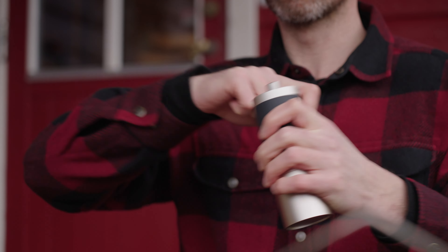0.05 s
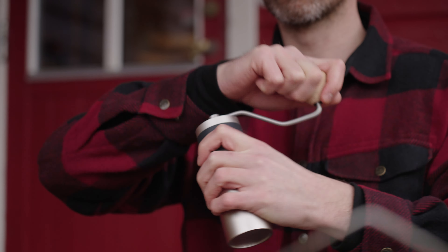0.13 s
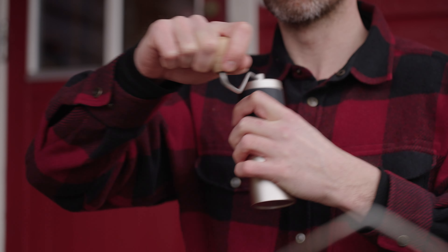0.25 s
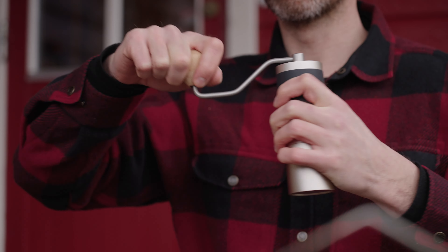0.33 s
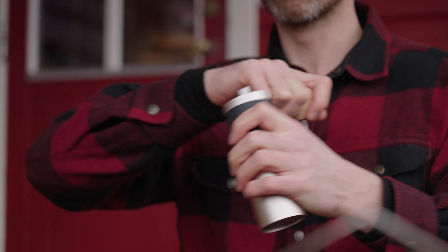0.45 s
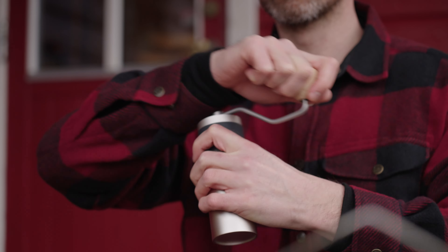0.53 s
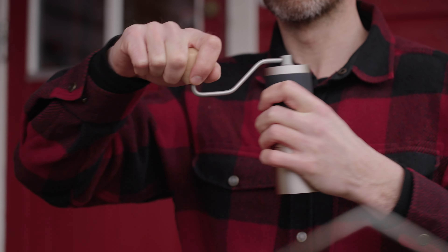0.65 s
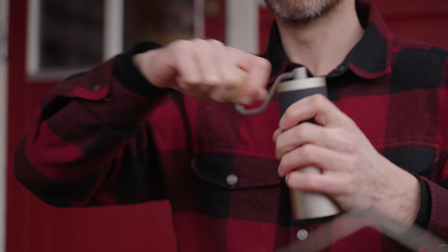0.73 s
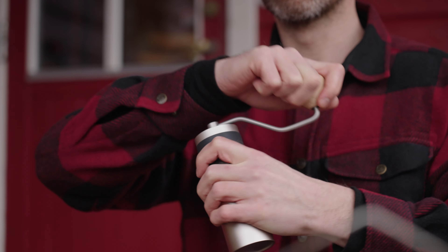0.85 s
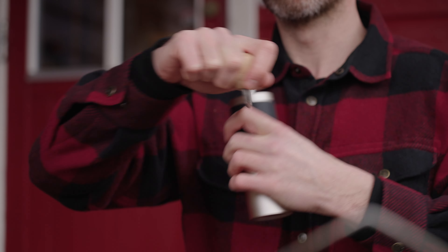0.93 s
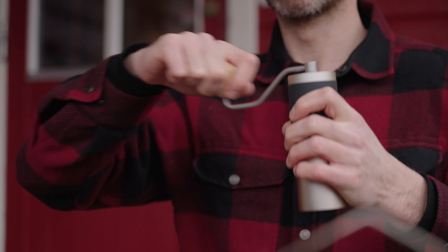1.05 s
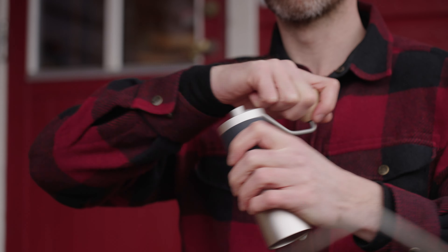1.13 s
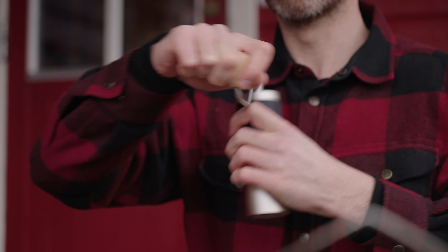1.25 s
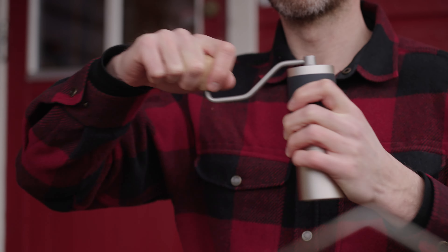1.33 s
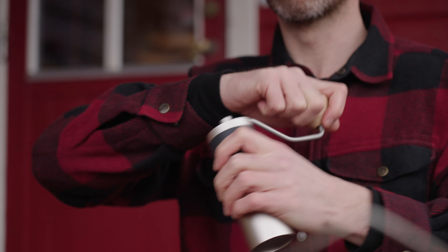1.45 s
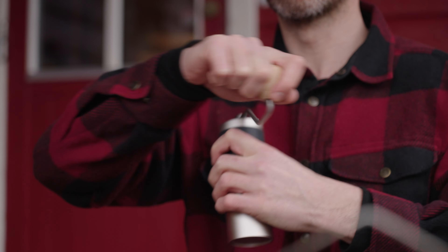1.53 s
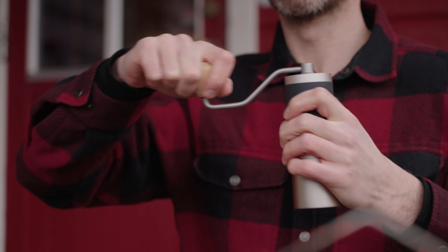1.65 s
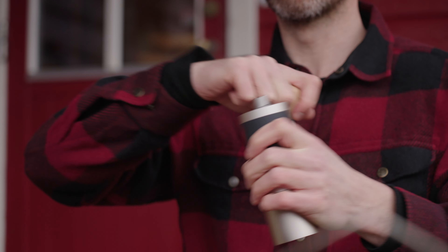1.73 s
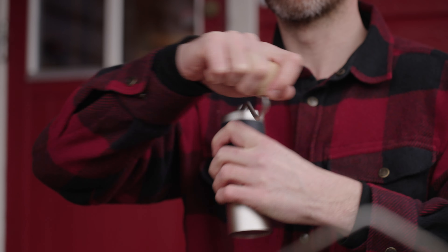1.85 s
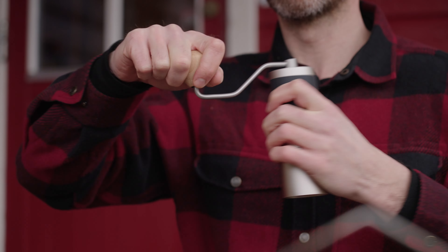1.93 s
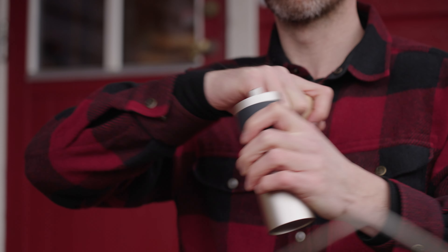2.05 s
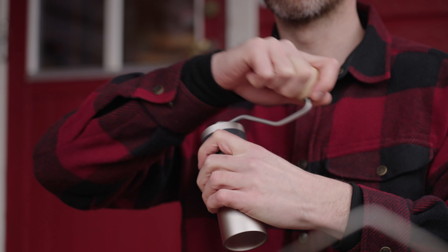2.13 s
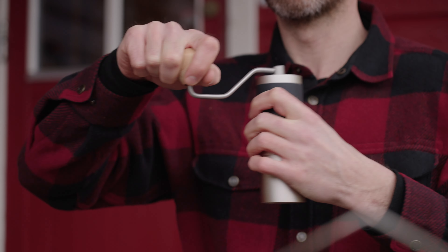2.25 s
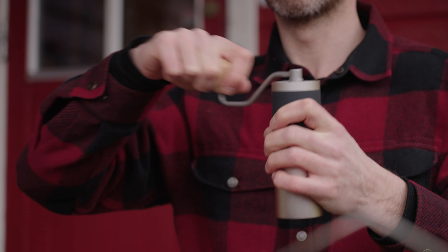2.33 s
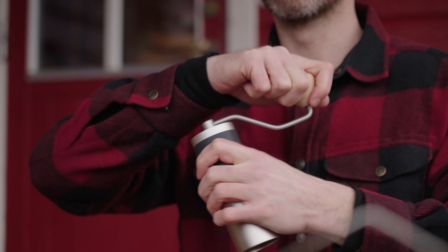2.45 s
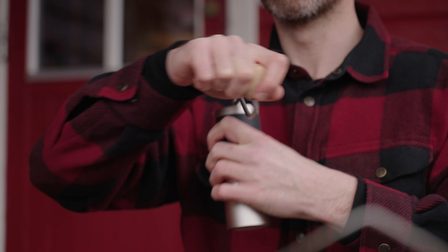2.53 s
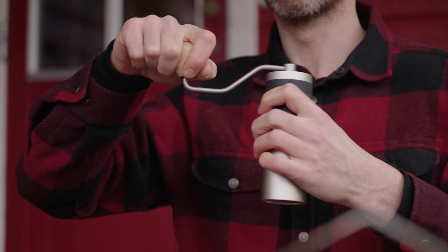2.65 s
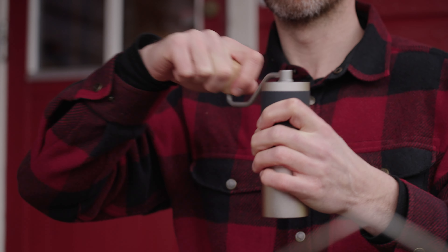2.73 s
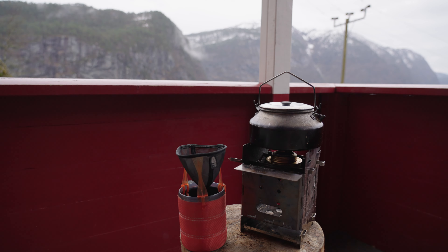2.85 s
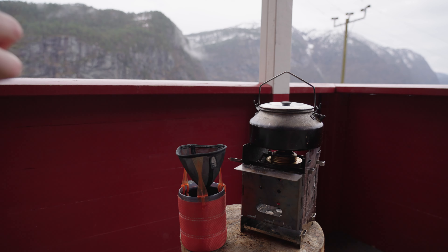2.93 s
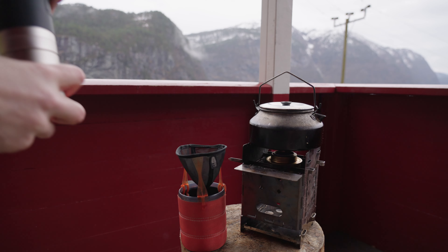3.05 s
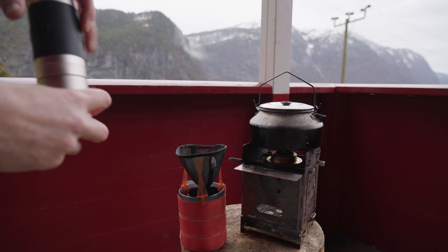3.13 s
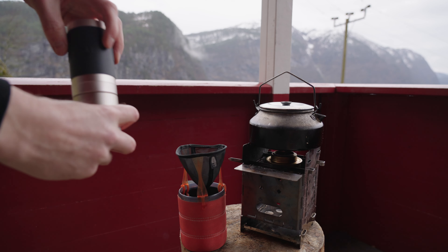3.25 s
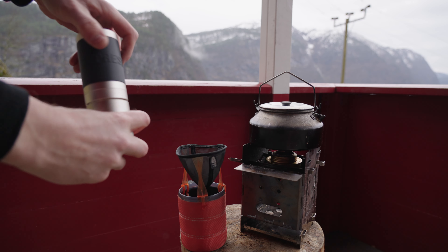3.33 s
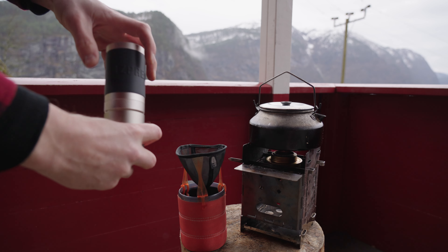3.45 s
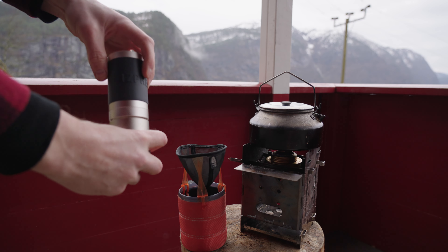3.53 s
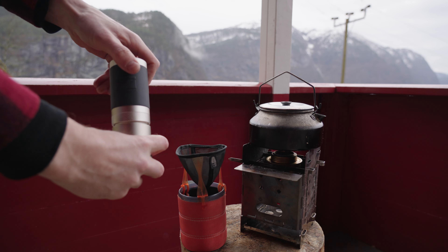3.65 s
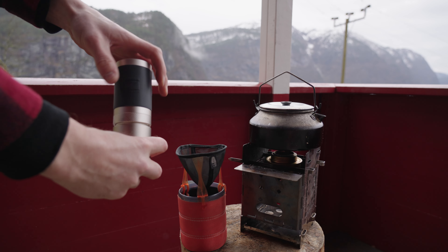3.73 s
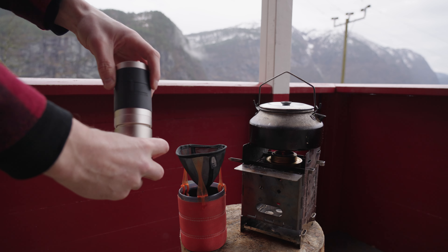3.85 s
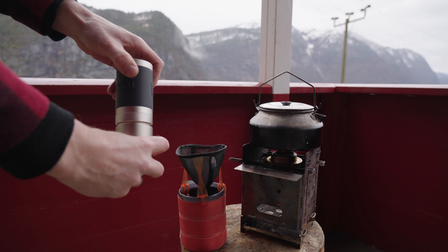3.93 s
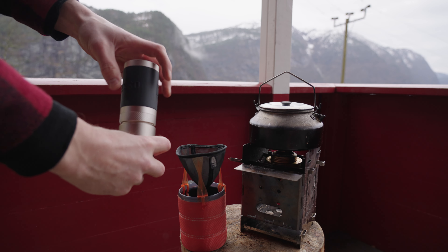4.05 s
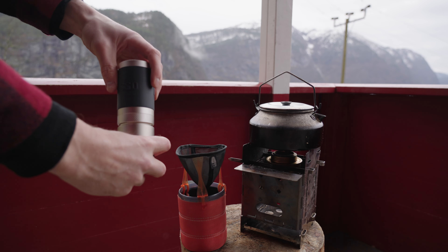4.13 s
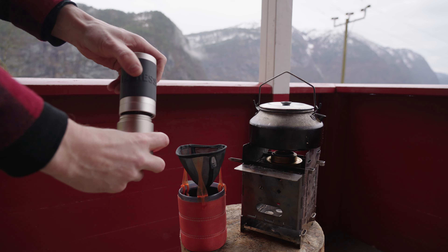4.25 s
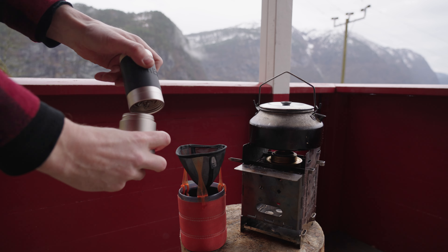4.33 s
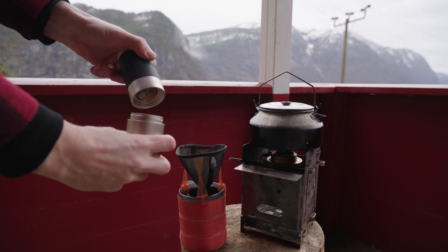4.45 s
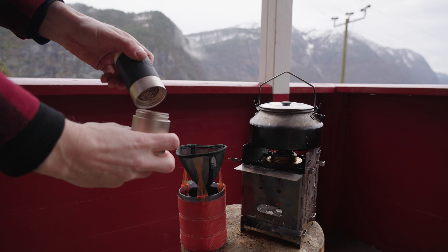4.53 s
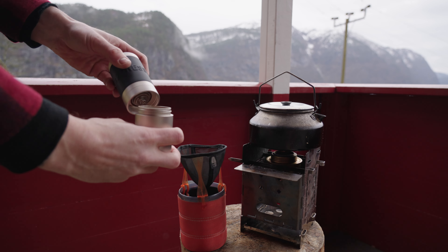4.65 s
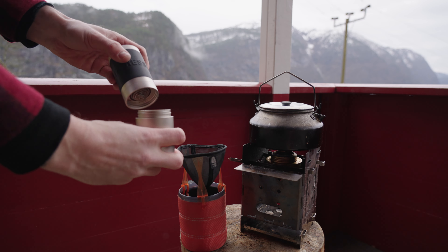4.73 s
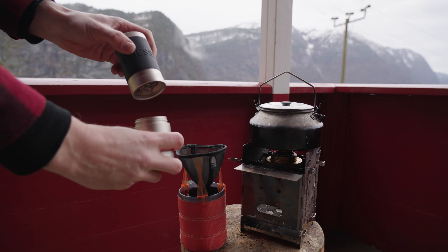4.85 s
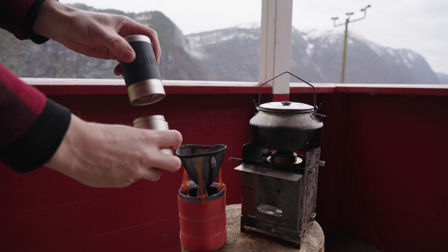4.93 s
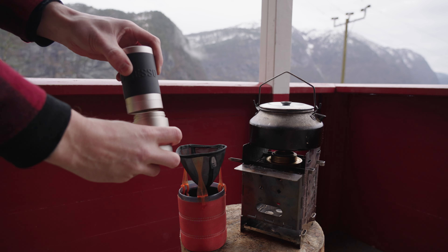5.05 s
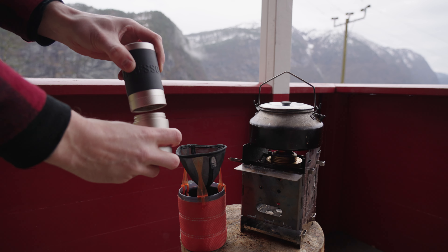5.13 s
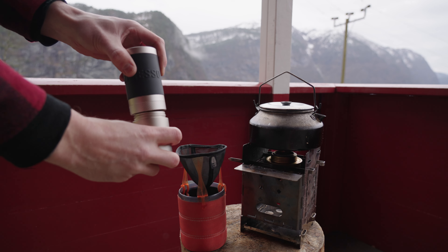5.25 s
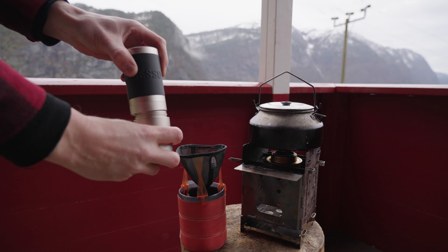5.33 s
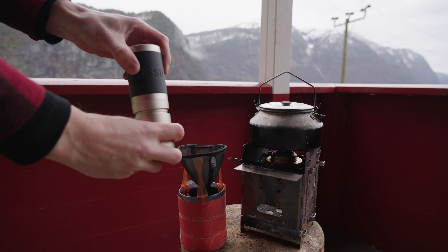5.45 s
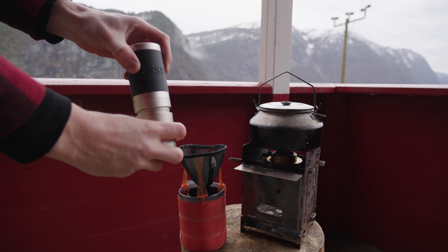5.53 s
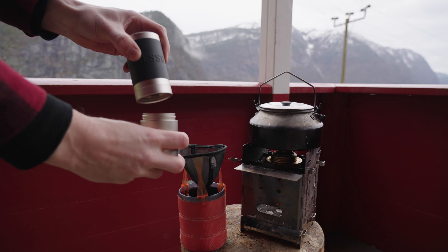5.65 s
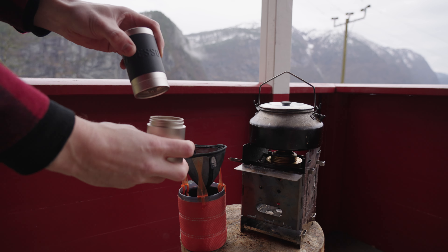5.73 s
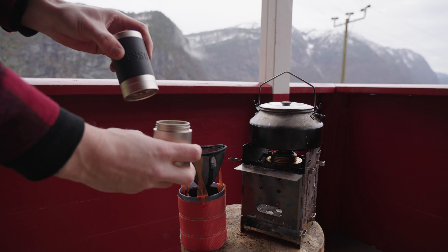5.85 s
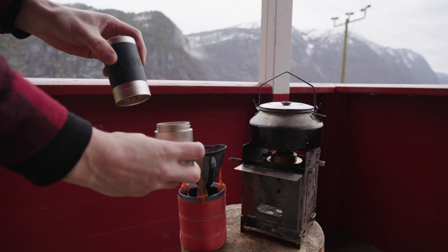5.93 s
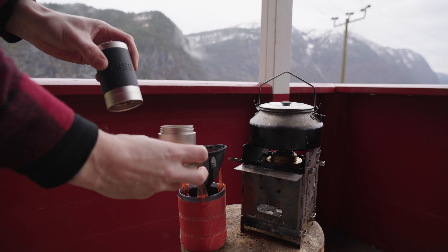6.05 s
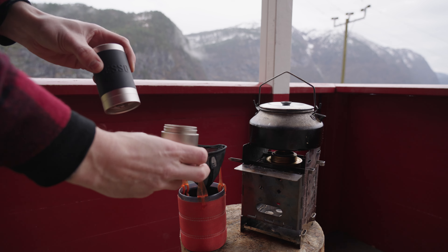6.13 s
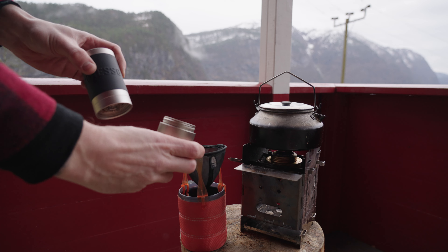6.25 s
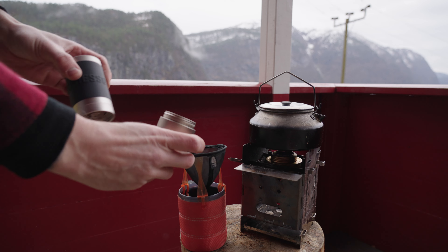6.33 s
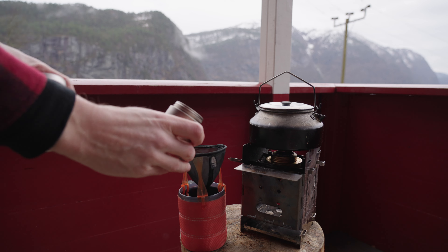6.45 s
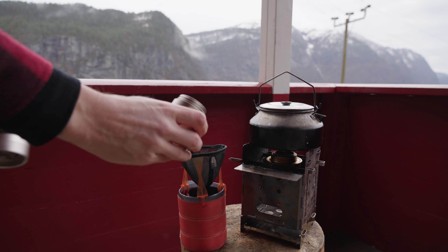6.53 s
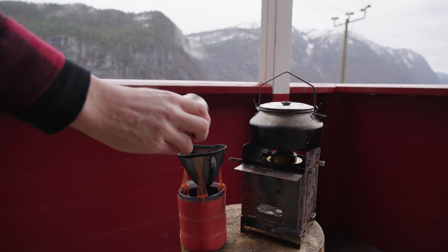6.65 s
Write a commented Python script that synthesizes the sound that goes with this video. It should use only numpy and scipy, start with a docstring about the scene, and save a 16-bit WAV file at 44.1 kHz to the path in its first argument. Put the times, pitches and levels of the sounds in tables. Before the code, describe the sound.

Close, dry crackling of beans in a manual coffee grinder, followed by short metallic thread scrapes and a cluster of bright metal taps.

```python
"""Coffee beans crush between the burrs of a hand-cranked grinder on an open wooden porch: random fractures drive
the resonances of barrel and crank, with a few short pings. From 2.9 s the metal cup is unscrewed in five twists,
as stick-slip noise on a wavering ring, with low squeaks and modal knocks. Then the cup is tapped on the barrel,
as decaying modes, and thin gliding whistles pass. Shaped noise lies below all as far outdoor air, with a faint
hum during the grinding; feedback delays give the porch."""
import sys
import numpy as np
from scipy import signal
from scipy.fft import rfft, irfft, next_fast_len
from scipy.io import wavfile

SR = 44100
rng = np.random.default_rng(int(sys.argv[2]) if len(sys.argv) > 2 else 0)


def voltage_ratio(decibels):
    """Convert decibels (scalar or array-like) to amplitude ratios, 20 dB per decade."""
    exponent = np.asarray(decibels, float) / 20
    return 10 ** exponent


def transcribe(signal):
    """Save signal, clipped to [-1, 1], as a 16-bit WAV file at the path in sys.argv[1]."""
    frames = np.atleast_2d(signal).T
    limited = np.clip(frames, -1, 1)
    pcm = np.round(limited * 32767).astype(np.int16)
    wavfile.write(sys.argv[1], SR, pcm)


N = 295462

# Far air spectrum. Each row: frequency in Hz, relative density in dB.
AIR_SPECTRUM = [(12, -42), (20, -15.5), (58, -36.5), (74, -13), (130, -1.5), (228, -5), (328, -11),
                (357, -1.5), (499, -12), (542, -6), (780, -7.5), (1860, -15.5), (3340, -26), (5380, -33),
                (11000, -36), (16000, -37.5)]
# Far air over time. Each row: time in seconds, rms at 100-500 Hz in dB, treble trim in dB, rumble rms in dB.
AIR_LEVEL = [(0, -55, 3.5, -86), (2.74, -56, 2, -85), (2.89, -55, 1, -73), (3.21, -57, 5, -75),
             (3.53, -57, 4, -84), (4.72, -58.5, 1.5, -84), (5.88, -58.5, 2, -82), (6.7, -58, 4.5, -87)]
# Hum over time. Each row: time in seconds, rms in dB.
HUM_LEVEL = [(0, -63.5), (1.2, -66), (2.5, -58), (2.87, -69), (2.89, -100)]
HUM_HZ = 265.8

# Load on the burrs. Each row: time in seconds, crunch drive in dB.
BURR_LOAD = [(0, -54), (.18, -54.5), (.21, -44.5), (.42, -51.5), (.69, -48), (.84, -60), (.95, -45.5),
             (1.08, -53.5), (1.2, -59), (1.5, -59), (1.58, -49.5), (1.73, -58), (1.88, -56), (1.97, -67.5),
             (2.3, -59), (2.56, -65.5), (2.59, -49), (2.88, -52)]
# Whole beans cracking. Each row: start in seconds, drive in dB, low-part trim in dB, high-part trim in dB.
BEAN_CRACKS = [(0.0183, -41, -12, -12), (0.055, -28, -20, -16.5), (0.2034, -30, -8, -16),
               (0.2127, -29, -17, -22), (0.2713, -37, -8, -28), (0.2822, -33, -9, -27),
               (0.3116, -34, -3, -25), (0.4365, -27.5, -10, -15), (0.4646, -32.5, -5.5, -9.5),
               (0.5306, -32.5, -5, -20), (0.555, -31, -6, -18), (0.6143, -29.5, -9, -16),
               (0.6424, -26.5, -6, -15.5), (0.6656, -33, -14, -19), (0.6817, -32, -6, -12),
               (0.7039, -34, -4, -23), (0.8694, -31, -21, -18), (0.9179, -23.5, -26, -13),
               (0.9438, -23.5, -16, -10), (1.0053, -32.5, -15, -10), (1.0426, -35.5, 1.5, -20),
               (1.1007, -36, -8, -8), (1.229, -28, -16, -15), (1.245, -34.5, -16, -7),
               (1.2938, -37.5, -10, -14), (1.3274, -36, -3, -12), (1.3362, -26.5, -19, -14),
               (1.3624, -47, -14, -18), (1.5234, -37, -9, -13), (1.5628, -37, -14, -16),
               (1.591, -41, -12, -13), (1.697, -40, -6, -19), (1.7479, -36, 2, -14),
               (1.7656, -32, -10, -22), (1.8463, -33, -15, -21), (2.0116, -38.5, -5, -21),
               (2.2707, -31, -15, -21), (2.3232, -37, -4, -26), (2.545, -39, -4, -8),
               (2.5749, -20.5, -29, -21), (2.5934, -40, -12, -20), (2.6767, -34, -3, -21),
               (2.7436, -29, -11, -23), (2.819, -35.5, 2, -11), (2.8688, -28, -13, -27)]
# Resonances of the barrel full of beans. Each row: frequency in Hz, width of the first filter in Hz, gain in dB.
BARREL_MODES = [(740, 450, -4), (1090, 196, 1), (1404, 407, -3), (2280, 690, 0), (3280, 630, -6.5),
                (3990, 690, 1), (5830, 2900, -13.5), (6690, 630, 1.5), (7530, 1150, -10), (8700, 1400, -9),
                (9480, 810, -8.5), (11600, 4800, -22), (13800, 1000, -29)]
# Resonances of the crank on its shaft. Each row: frequency in Hz, width of the first filter in Hz, gain in dB.
CRANK_MODES = [(2620, 110, -34), (5430, 380, -13.5), (8670, 530, -4.5)]
# Loose shaft rattling, under the crank and later in the hand. Each row: start in seconds, push in dB,
# time constant in ms.
SHAFT_RATTLES = [(.765, -60, 8), (.782, -41.5, 8.7), (1.115, -40, 5.6), (1.174, -47.5, 11),
                 (1.219, -43.5, 6), (1.411, -38.5, 19), (1.435, -49, 13), (1.477, -44.5, 9),
                 (1.74, -49, 13), (1.871, -45.5, 14), (2.042, -43.5, 18), (2.18, -50, 8.3),
                 (2.392, -48, 12), (3.14, -63, 15), (3.225, -65, 10), (3.27, -60, 10), (3.75, -60, 10),
                 (3.79, -64, 8), (3.835, -63, 10), (4.055, -59, 24)]
RATTLE_IN_BARREL_DB, RATTLE_IN_SHAFT_DB = 12, 17
LOW_PUSH_DB, MIDDLE_PUSH_DB, HIGH_PUSH_DB = 12, 6.5, 5   # crunch on each group of resonances
CRUMBLE_DB, CRUMBLE_MS = -26.5, 15   # splinters after each crack: level against its drive, time constant
CHIPS_PER_S, CHIP_DB, CHIP_SPREAD_DB = 30, 10, 3.5   # small chips snapping: rate, drive over the crunch

PORCH_T60_S, PORCH_DB, WALL_CUT_HZ = 0.18, -19, 4100

# Short pings of the barrel. Each row: start in seconds, initial level in dB, frequency in Hz.
BARREL_PINGS = [(.056, -38.5, 2500), (.443, -40, 2280), (2.012, -41.5, 2400)]
PING_T60_S = 0.037

# Twists of the cup, one list per twist. Each row: time in seconds, rub drive in dB, pitch of the loose cup in Hz.
CUP_TWISTS = [
    [(2.89, -66, 5150), (2.932, -56, 4940), (2.968, -59, 4760), (2.996, -41.5, 4760), (3.012, -49, 4780),
     (3.028, -37.5, 4720), (3.046, -45, 4760), (3.078, -38.5, 4720), (3.13, -83, 4770)],
    [(3.27, -70, 5060), (3.308, -36, 5040), (3.33, -35.5, 4900), (3.408, -45, 5220), (3.422, -68, 5090),
     (3.45, -67, 5060)],
    [(3.56, -63, 5080), (3.608, -40, 5100), (3.632, -43, 4930), (3.652, -33, 5080), (3.698, -61, 4970),
     (3.72, -65, 4960)],
    [(3.84, -67, 5100), (3.85, -72, 4990), (3.892, -44, 4850), (3.948, -39.5, 4800), (4.03, -72, 4670)],
    [(4.16, -70, 5100), (4.218, -41.5, 4830), (4.24, -51, 4670), (4.254, -41.5, 4600), (4.276, -51, 4670),
     (4.286, -40.5, 4730), (4.304, -47, 4600), (4.34, -88, 4640)],
]
# Other resonances of the rubbing thread. Each row: frequency in Hz, width of the first filter in Hz, gain in dB.
THREAD_MODES = [(1090, 410, -3), (1770, 730, -6.5), (2130, 860, -9), (3060, 870, -13.5), (5540, 400, -25),
                (6330, 1100, -7.5), (7200, 150, 5), (7770, 150, 2.5), (8700, 1200, -24), (10060, 1200, -12),
                (10800, 900, -20), (12100, 900, -8.5), (14300, 2700, -36)]
DULL_DB, SHRILL_DB = -12.5, -18   # push on the thread's low and high resonances against the rub

# Metal striking metal. Each row: start in seconds, bright drive in dB, ring drive in dB, thud drive in dB,
# ring frequency in Hz.
METAL_TAPS = [(2.9944, -33, -31.5, -29, 4710), (3.8067, -49, -47, -38, 4930), (3.8384, -57, -66, -38, 4870),
              (3.9453, -33, -29, -22, 4700), (4.0056, -58, -60, -35, 4830), (5.2502, -28, -26, -24, 4520),
              (5.3602, -26, -21.5, -21.5, 4570), (5.4606, -16, -18.5, -19, 4550),
              (5.465, -19, -45, -25, 4700), (5.4929, -30, -13, -23, 4556),
              (5.4986, -19.5, -15, -23.5, 4526), (5.541, -42, -47, -33, 4630),
              (5.5736, -45.5, -24.5, -19.5, 4750), (5.5771, -36, -44, -25.5, 4760),
              (5.579, -39, -21, -25, 4690), (5.5843, -32, -26, -28.5, 4620), (5.6072, -48, -57, -55, 4650)]
# Other modes of cup and barrel held in the hands. Each row: frequency in Hz, gain in dB, T60 in seconds before
# the contact damping.
CUP_MODES = [(198, -14, .03), (380, -13, 0.0079), (536, -10.5, 0.065), (737, -13, 0.09), (940, -4.5, 0.03),
             (1044, -10, 0.086), (1178, -8.5, 0.055), (1560, -11, 0.036), (1880, -7.5, 0.019),
             (2130, -7.5, 0.026), (2460, -15, 0.02), (3000, -11.5, .04), (3280, -13, 0.013),
             (3630, -14, 0.045), (4210, -13.5, 0.036), (4990, -7, 0.04), (5450, -10, 0.057),
             (5700, -16, .05), (6670, -29.5, .04), (7600, -15, 0.059), (7520, -20, 0.053), (9330, -32, .05),
             (12310, -21.5, 0.032)]
# Weak lingering ring, as one row: frequency in Hz, level against the ring drive in dB, T60 in seconds.
AFTER_RING = (4544, -22.5, 0.19)
RING_T60_S = 0.065   # before the contact damping
# Pressing contact raises the ring and shortens it: share of T60 left, shrinking e-fold per DAMP_HZ of rise.
FREE_SHARE, DAMP_HZ = 0.58, 380

# Low squeaks of the thread. Each row: start in seconds, length in seconds, first frequency in Hz,
# last frequency in Hz, level in dB before flutter and fades.
THREAD_SQUEAKS = [(3.055, .06, 1706, 1870, -54.5), (3.964, 0.028, 1900, 1560, -48),
                  (4.254, .05, 926, 595, -57.5)]
# Thin whistles. Each row: start in seconds, length in seconds, first frequency in Hz, last frequency in Hz,
# level in dB before flutter and fades.
THIN_WHISTLES = [(5.278, .075, 8400, 8200, -69), (5.8, .045, 8300, 8200, -83), (5.9, .06, 7440, 7200, -82)]

BASS_LOSS_HZ, TOP_HZ = 170, 17300


def rms_one(x):
    """Normalisation: scale to unit power."""
    return x / np.sqrt(np.mean(x ** 2) + 1e-20)


def in_time(rows, silent=None):
    """Linear interpolation of the columns in time; the first can fall to a silent value outside the rows."""
    s, *columns = np.transpose(rows)
    t = np.arange(N) / SR
    first = np.interp(t, s, columns[0], left=silent, right=silent)
    return [first] + [np.interp(t, s, column) for column in columns[1:]]


def drift(rate_hz):
    """Low-passed randomness: slow fluctuation of spread 1, through two equal poles at every 40th sample."""
    r = np.exp(-80 * np.pi * rate_hz / SR)
    slow = signal.lfilter([1], [1, -2 * r, r * r], rng.standard_normal(N // 40 + 2002))
    slow = slow[2000:]   # past the filter's start
    return np.interp(np.arange(N) / 40, np.arange(len(slow)), rms_one(slow))


def band(x, low_hz, high_hz):
    """Band-pass filtering between two corner frequencies."""
    return signal.sosfilt(signal.butter(2, [low_hz, high_hz], "band", fs=SR, output="sos"), x)


def resonance(x, hz, width_hz):
    """Damped resonator: a pole pair with gain near 1 at its peak."""
    r = np.exp(-np.pi * width_hz / SR)
    numerator = np.array([1, 0, -1]) * (1 - r * r) / 2
    return signal.lfilter(numerator, [1, -2 * r * np.cos(2 * np.pi * hz / SR), r * r], x)


def double_resonance(x, hz, width_hz):
    """Cascaded resonators: the second is twice as wide, which steepens the skirts."""
    return resonance(resonance(x, hz, width_hz), hz, 2 * width_hz)


def grains(per_s, spread_db, smooth):
    """Shot noise: random clicks of uneven size over a share of smooth friction noise, at unit power."""
    sizes = voltage_ratio(spread_db * np.minimum(rng.exponential(1, N), 5)) * rng.choice([-1, 1], N)
    clicks = rms_one(sizes * (rng.random(N) < per_s / SR))
    return rms_one(clicks + smooth * rng.standard_normal(N))


def bursts(times, db, ms):
    """Exponential relaxation: an envelope that jumps at each time and dies with its own time constant."""
    out, t = np.full(N, 1e-18), np.arange(4000) / SR
    tau_s = np.broadcast_to(np.maximum(ms, .1) / 1000, len(times))
    for s, gain, tau in zip(times, voltage_ratio(db), tau_s):
        i = round(s * SR)
        out[i:i + 4000] += gain * np.exp(-t / tau)
    return out


def tones(rows, flutter_db, waver_hz, fade):
    """Frequency modulation: gliding near-sines that waver and flutter, fading over a share of their length."""
    out, waver, flutter = np.zeros(N), waver_hz * drift(74), voltage_ratio(flutter_db * drift(70))
    for start, length, first_hz, last_hz, level_db in rows:
        u = np.linspace(0, 1, round(length * SR))
        span = round(start * SR) + np.arange(len(u))
        phase = 2 * np.pi * np.cumsum(first_hz + (last_hz - first_hz) * u + waver[span]) / SR
        envelope = flutter[span] * np.minimum(np.minimum(u, 1 - u) / fade, 1)
        out[span] = np.sqrt(2) * voltage_ratio(level_db) * envelope * np.sin(phase)
    return out


def air(patchy_db=1.53):
    """Band-shaped noise: half-octave bands wander in level, over a deep rumble and a hum ending with the grinding."""
    out, edges = 0, 20 * 2 ** np.arange(0, 10, .5)
    white, (hz, db) = rng.standard_normal((2, N)), np.transpose(AIR_SPECTRUM)
    level_db, treble_db, rumble_db = in_time(AIR_LEVEL)
    for k, (low, high) in enumerate(zip(edges, edges[1:])):
        band_db = np.interp(np.log(low * high) / 2, np.log(hz), db) + treble_db * (2500 < low < 7000)
        out = out + voltage_ratio(band_db + patchy_db * drift(3.0)) * band(white[k % 2], low, high)
    out = voltage_ratio(level_db) * out / np.std(band(out, 100, 500))
    hum = rms_one(resonance(rng.standard_normal(N), HUM_HZ, 1.9))
    rumble = rms_one(band(rng.standard_normal(N), 25, 65))
    return out + voltage_ratio(in_time(HUM_LEVEL)[0]) * hum + voltage_ratio(rumble_db) * rumble


def grinder():
    """Forced resonance: clumped splinters, cracking beans, snapping chips and rattles drive barrel and crank."""
    crunch_db, = in_time(BURR_LOAD, silent=-140)
    s, snap_db, low_db, high_db = np.transpose(BEAN_CRACKS)
    crumble = bursts(s, snap_db + CRUMBLE_DB, CRUMBLE_MS) * (crunch_db > -100)
    crunch = voltage_ratio(crunch_db) + crumble
    # chips join the list of cracks at random times
    grind_s = BURR_LOAD[-1][0]
    when, size, tilt = rng.random((int(CHIPS_PER_S * grind_s), 3)).T
    when = when * grind_s
    chip_db = crunch_db[(when * SR).astype(int)] + CHIP_DB - CHIP_SPREAD_DB * np.log(size + 0.055)
    s, snap_db = np.append(s, when), np.append(snap_db, chip_db)
    low_db = np.append(low_db, -6 - 8 * tilt)
    high_db = np.append(high_db, -20 + 12 * tilt)

    splinters = grains(1200 * voltage_ratio(5 * drift(25)), spread_db=1.5, smooth=0.62)
    shatter = rng.choice([-1, 1], N)    # a crack is a run of even, full-strength breaks
    snap_ms, snap_lag_s = 1.2, .001

    def drive(push_db, trim_db):
        """Superposition of steady crunch and sudden snaps."""
        snaps = bursts(s + snap_lag_s, snap_db + trim_db, snap_ms)
        return voltage_ratio(push_db) * crunch * splinters + snaps * shatter

    low = drive(LOW_PUSH_DB, low_db + 13.5)
    middle = drive(MIDDLE_PUSH_DB, 2.5)
    high = drive(HIGH_PUSH_DB, high_db + 21.5)
    rattle = bursts(*np.transpose(SHAFT_RATTLES)) * splinters
    shaft = high + voltage_ratio(RATTLE_IN_SHAFT_DB) * rattle
    high = high + voltage_ratio(RATTLE_IN_BARREL_DB) * rattle

    out = voltage_ratio(-14.0) * band(middle, 1430, 6540)    # heard straight from the burrs
    for k, (hz, width, level_db) in enumerate(BARREL_MODES):
        push = low if hz <= 2000 else middle if hz <= 8000 else high
        # beans shift in the barrel, so each resonance comes and goes
        out += (-1) ** k * voltage_ratio(level_db + 2.26 * drift(16.6)) * double_resonance(push, hz, width)
    for hz, width, level_db in CRANK_MODES:
        out += voltage_ratio(level_db) * double_resonance(shaft, hz, width)
    return out


def porch(x):
    """Recirculating reflection: ten delays between boards and windows dull each round; two near-allpasses scatter."""
    size = next_fast_len(N + SR)
    w = 2 * np.pi * np.arange(size // 2 + 1) / size
    dull = 1 / (1 + 1j * w * SR / (2 * np.pi * WALL_CUT_HZ))
    response = 0
    for k, lag in enumerate(rng.uniform(.004, 0.023, 10)):
        loop = voltage_ratio(-60 * lag / PORCH_T60_S) * dull * np.exp(-1j * w * lag * SR)
        response = response + (-1) ** k * loop / (1 - loop)
    for lag in (.0013, .0037):
        late = np.exp(-1j * w * lag * SR)
        response = response * (late - .6) / (1 - 0.53 * late)
    return irfft(rfft(x, size) * response, size)[:N]


def pings():
    """Free vibration: one struck mode of the barrel that dies quickly."""
    out, t = np.zeros(N), np.arange(SR // 8) / SR
    for s, db, hz in BARREL_PINGS:
        out[round(s * SR):][:len(t)] += voltage_ratio(db - 60 * t / PING_T60_S) * np.sin(2 * np.pi * hz * t)
    return out


def unscrewing(core_hz=100, foot_hz=700, foot_db=-9):
    """Stick-slip: uneven thread grains drive the cup, whose ring shifts as its hold on the barrel changes."""
    columns = np.array([in_time(rows, silent=-140) for rows in CUP_TWISTS])
    turn = np.argmax(columns[:, 0], axis=0)   # the twist sounding at each sample
    rub_db, pitch_hz = np.take_along_axis(columns, turn[None, None], axis=0)[0]
    slips = voltage_ratio(rub_db + 16.0) * grains(1200 * voltage_ratio(4.1 * drift(50)), spread_db=1.0, smooth=0.77)
    # a moving resonance, sharp core on a broad foot: low-passed slips carried on the wavering pitch
    phase = np.exp(2j * np.pi * np.cumsum(pitch_hz + 60 * drift(33)) / SR)
    core, foot = np.exp(-np.pi * core_hz / SR), np.exp(-np.pi * foot_hz / SR)
    still = slips / phase
    sharp = signal.lfilter([1 - core], [1, -core], still)
    broad = signal.lfilter([(1 - foot) ** 2], [1, -2 * foot, foot ** 2], still)
    out = 2 * np.real(phase * (sharp + voltage_ratio(foot_db) * broad))
    for k, (hz, width, level_db) in enumerate(THREAD_MODES):
        push = slips * voltage_ratio(DULL_DB if hz < 4000 else SHRILL_DB)
        out += (-1) ** k * voltage_ratio(level_db + 3.3 * drift(9.6)) * double_resonance(push, hz, width)
    return out


def taps(stray=0.047, contact_s=0.00032):
    """Modal impact: each tap excites all modes with its own strengths and grip; loose parts clatter after it."""
    s, bright_db = np.transpose(METAL_TAPS)[:2]
    crack, clatter = bursts(s, bright_db - 2.0, 0.58), bursts(s, bright_db - 5.5, 7.0)
    noise = grains(15000, spread_db=2.0, smooth=0.67)
    out = band(crack * noise, 1500, 6300) + band(clatter * noise, 700, 4500)
    hz, level_db, t60 = np.transpose(CUP_MODES)[:, :, None]
    after_hz, after_db, after_t60 = AFTER_RING
    t = np.arange(SR // 4) / SR
    chance = rng.standard_normal((len(METAL_TAPS), 3, len(CUP_MODES), 1))
    for (start, bright_db, ring_db, thud_db, ring_hz), (strength, shift, turn) in zip(METAL_TAPS, chance):
        free = FREE_SHARE * np.exp((after_hz - ring_hz) / DAMP_HZ)
        blow_db = np.select([hz < 2000, hz < 6000], [thud_db, bright_db], ring_db - 8)
        blow_db = blow_db + level_db + 3 * strength
        pitch_hz = hz * (1 + stray * shift * (hz < 4400))    # the grip detunes the damped low modes
        modes = voltage_ratio(blow_db - 60 * t / (t60 * free)) * np.sin(2 * np.pi * (pitch_hz * t + turn))
        ring = voltage_ratio(ring_db - 60 * t / (RING_T60_S * free)) * np.sin(2 * np.pi * ring_hz * t)
        after = voltage_ratio(ring_db + after_db - 60 * t / after_t60) * np.sin(2 * np.pi * after_hz * t)
        i = round(start * SR)
        # the finite contact time softens the onset
        out[i:i + len(t)] += (np.sum(modes, axis=0) + ring + after) * (1 - np.exp(-t / contact_s))
    return out


def squeaks():
    """Gliding oscillation: the rubbing thread squeaks low."""
    return tones(THREAD_SQUEAKS, flutter_db=3.0, waver_hz=50, fade=.25)


def whistles():
    """Gliding oscillation: thin, high near-sines falling slightly in pitch."""
    return tones(THIN_WHISTLES, flutter_db=4.0, waver_hz=130, fade=.2)


def scene():
    """Superposition: hands at work near the microphone, the porch's reflections, whistles and far air."""
    near = grinder() + pings() + unscrewing() + taps() + squeaks()
    # small things radiate no bass
    near = signal.sosfilt(signal.butter(4, BASS_LOSS_HZ, "high", fs=SR, output="sos"), near)
    return (near + voltage_ratio(PORCH_DB) * porch(near) + whistles() + air())[None]


def top_cut(x):
    """Nothing passes above the cut-off."""
    return signal.sosfilt(signal.butter(12, 16580, fs=SR, output="sos"), x)


def record(dry):
    """Band limitation: a steep low-pass removes the extreme treble."""
    mix = signal.sosfilt(signal.cheby2(10, 50, TOP_HZ, fs=SR, output="sos"), dry)
    return top_cut(mix)


dry = scene()
out = record(dry)
transcribe(out)
```